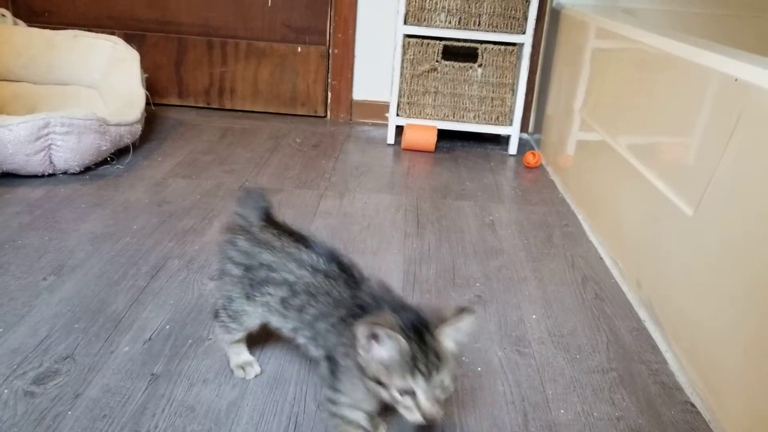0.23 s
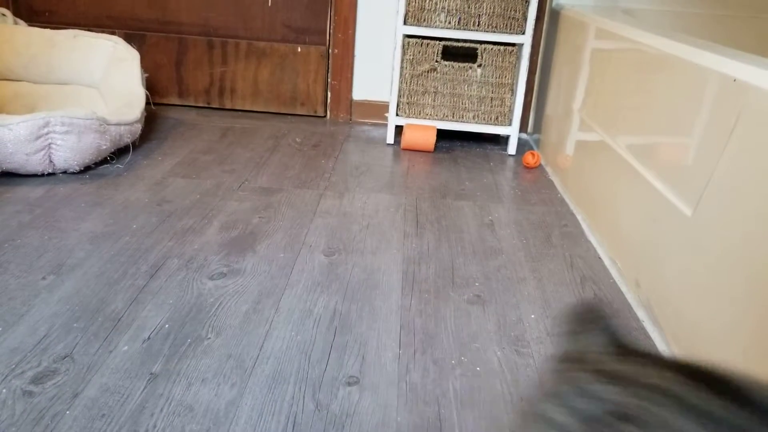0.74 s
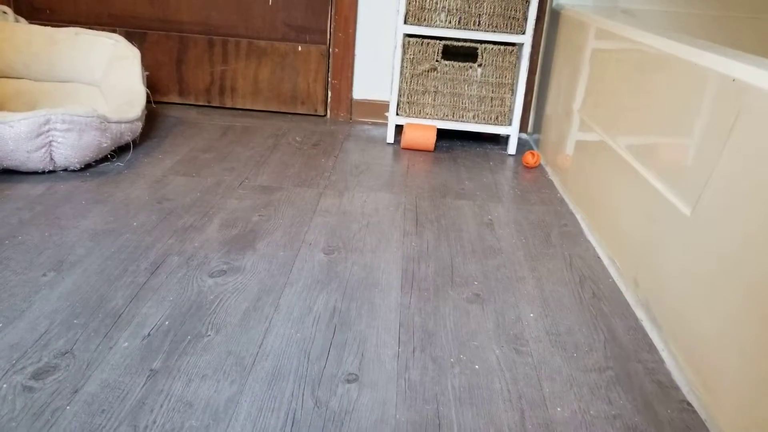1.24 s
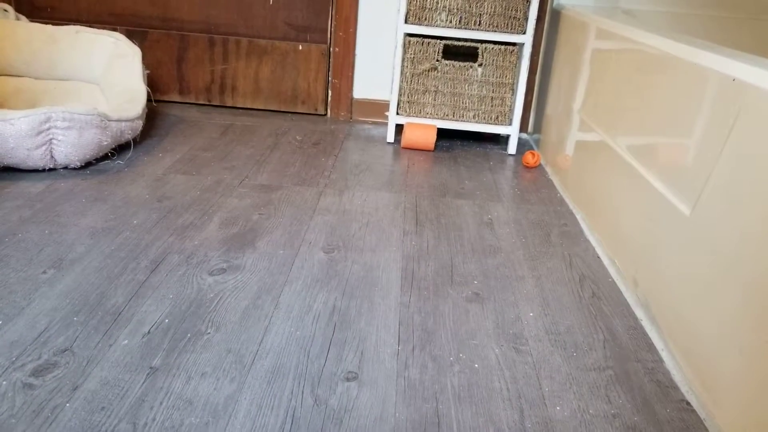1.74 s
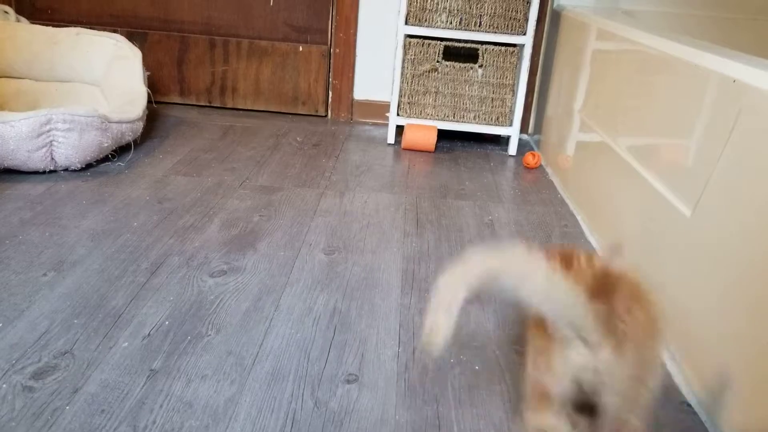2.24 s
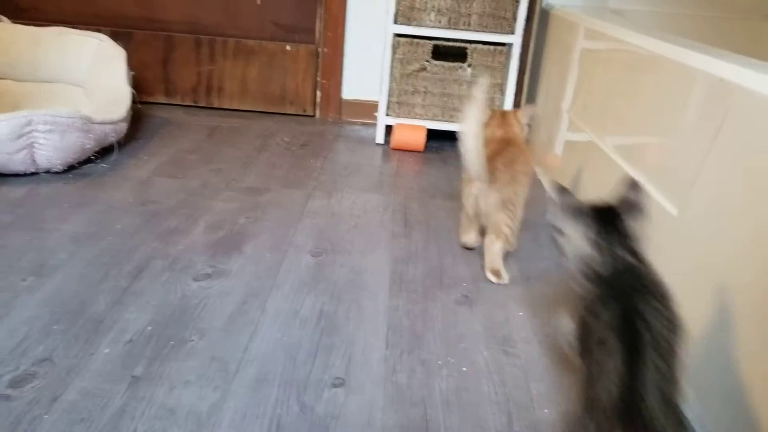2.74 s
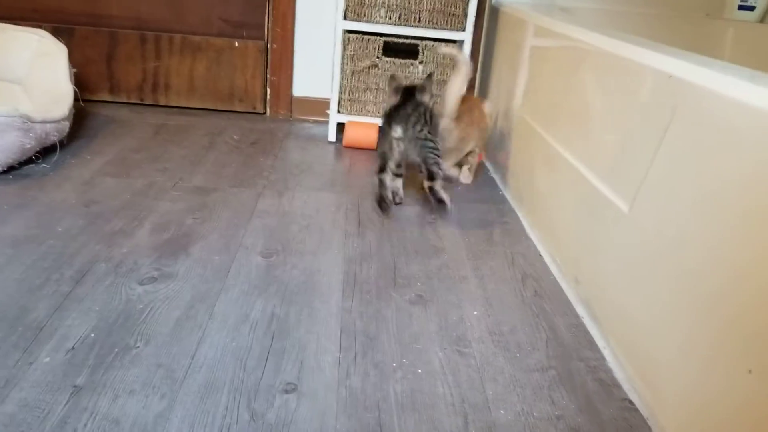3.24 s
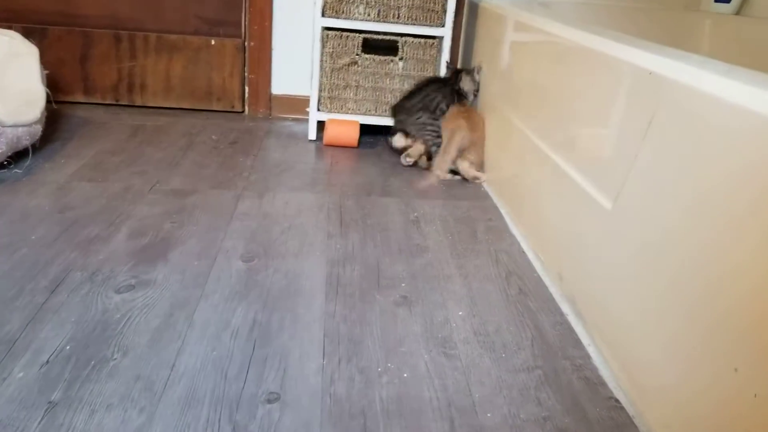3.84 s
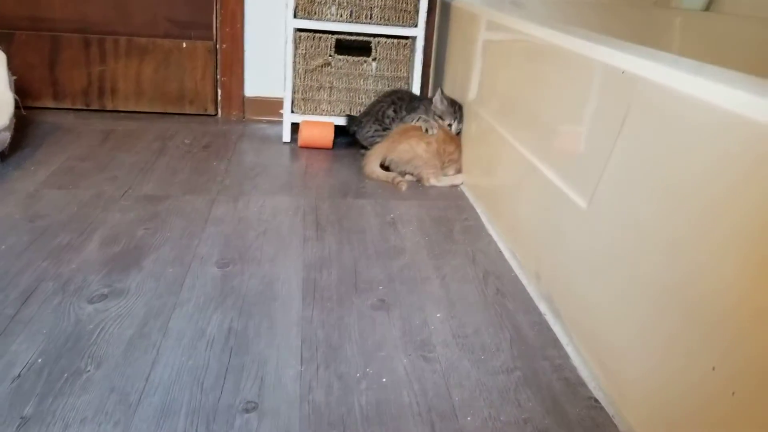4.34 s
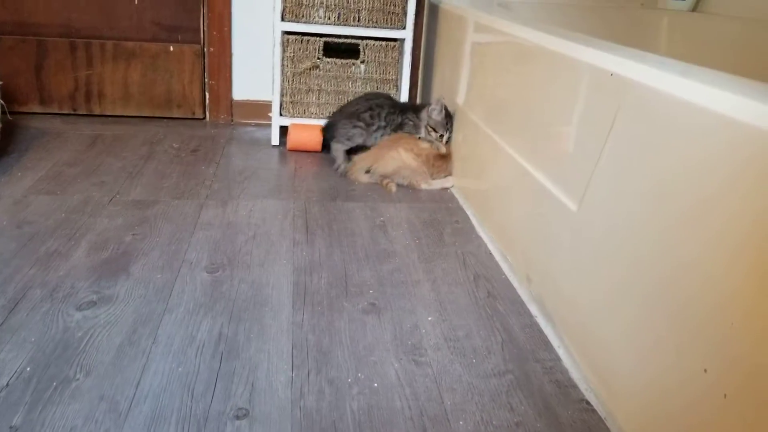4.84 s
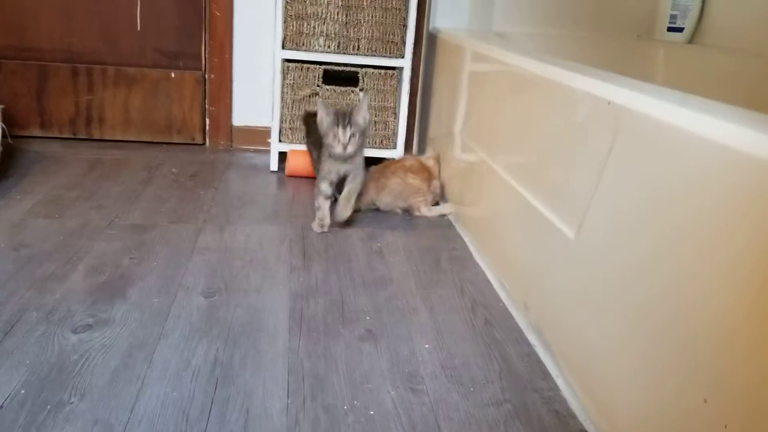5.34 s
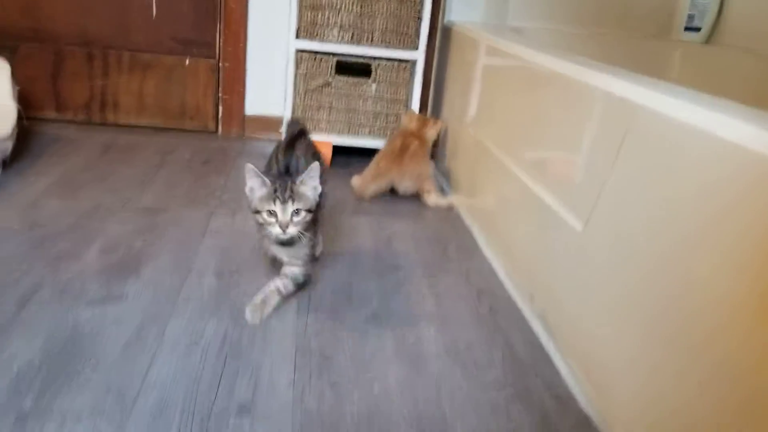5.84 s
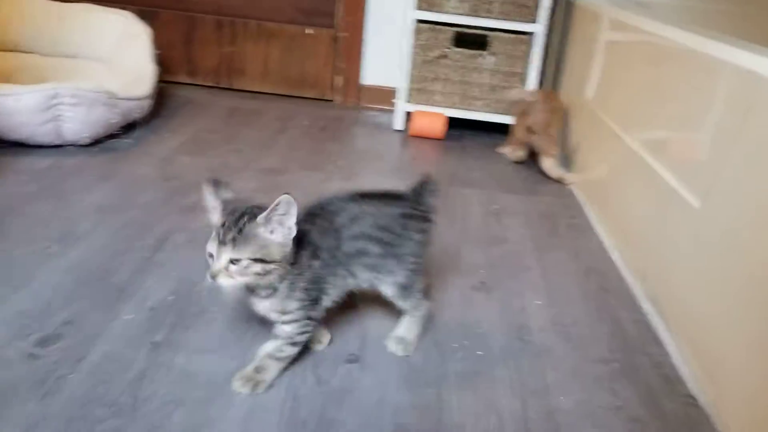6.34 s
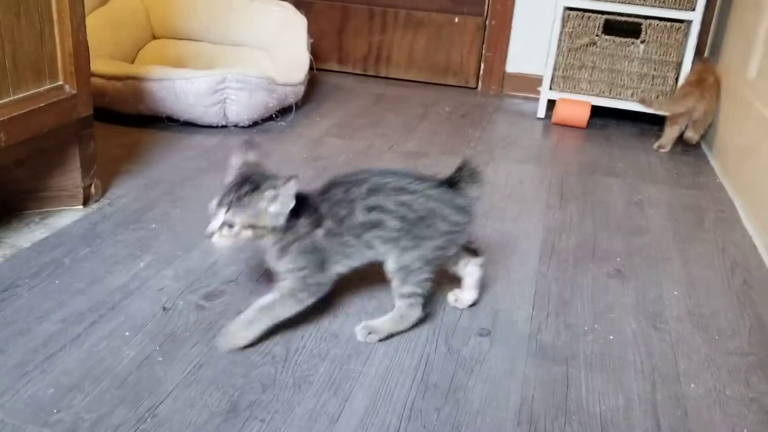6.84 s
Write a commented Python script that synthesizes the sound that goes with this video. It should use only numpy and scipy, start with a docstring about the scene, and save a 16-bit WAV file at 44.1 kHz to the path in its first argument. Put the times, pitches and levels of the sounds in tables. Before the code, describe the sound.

A quiet small room with low rumble and faint hiss. From about 0.8 to 1.5 s, soft paw thuds on laminate quicken, with two crisp claw scratches near 1 s and firmer steps at 1.35 and 1.5. After a pause, a thud and scratch come at 2.0, then light patter runs from 2.4 to 3.4, receding. Around 3.5 a longer claw scratch leads into overlapping low panel booms and a wooden knock at 3.6-3.75, as a toy ball jingles thinly. A paw thuds at 3.8; the loudest, sharp shelf knock hits at 4.05 with a hollow phone rub. It calms until a tiny pop and faint knock near 5.0. At 5.7 a bright quick scrape, light knock, jingle and hollow rub coincide. Soft steps, slides, claw ticks, small jingles and repeated handling rubs continue to 7 s, with another light knock at 6.9.

```python
"""Two kittens at play on a laminate floor

Paws thud as decaying board modes with a dull noise patter; claws tick, and claws, pads and fur scrape
as stick-slip grains. Bodies bump a wall panel (low modes) and a wooden shelf (noise plus modes).
A toy ball jingles with randomly struck bell modes; finger friction rings a hollow phone case and one
tiny pop sounds. A small room adds decaying noise tails, over a low rumble with faint hiss."""
import sys
import numpy as np
from scipy import signal
from scipy.fft import rfft, irfft, next_fast_len
from scipy.io import wavfile
from scipy.ndimage import uniform_filter1d

SR = 44100
rng = np.random.default_rng(int(sys.argv[2]) if len(sys.argv) > 2 else 0)


def unload_wav(signal):
    """Save mono or channel-first audio to the path in sys.argv[1] as 16-bit WAV at rate SR, clipped to [-1, 1]."""
    wavfile.write(
        sys.argv[1],
        SR,
        np.round(np.clip(np.atleast_2d(signal).T, -1, 1) * 32767).astype(np.int16),
    )


N = 312479
AGE = np.arange(SR // 2) / SR  # s since the start of one event
TIME = np.arange(N) / SR  # s since the start of the scene


def undb(db):
    """Level law: decibels to amplitude gain."""
    return 10 ** (np.asarray(db) / 20)


def fade(t60):
    """Exponential decay: 60 dB lost in t60 seconds."""
    return np.exp(-np.log(1000) * AGE / t60)


def noise_burst():
    """White noise as long as one event: equal power at all frequencies."""
    return rng.standard_normal(len(AGE))


def shape(x, gain):
    """Linear filtering: multiply the spectrum by a gain that is a function of frequency."""
    size = next_fast_len(x.shape[-1] + 4096)
    f = np.maximum(np.fft.rfftfreq(size, 1 / SR), 1)
    return irfft(rfft(x, size) * gain(f), size)[..., :x.shape[-1]]


def colour(x, points):
    """Spectral envelope: filter by (f/Hz, level/dB) points joined on a logarithmic frequency axis."""
    hz, db = np.transpose(points)
    return shape(x, lambda f: undb(np.interp(np.log(f), np.log(hz), db)))


def band(x, lo, hi, order=3):
    """Causal band-pass: the output never precedes the excitation."""
    sos = signal.butter(order, [lo, min(hi, SR / 2 - 100)], "band", fs=SR, output="sos")
    return signal.sosfilt(sos, x)


def loudest(x, db, size=441):
    """Short-time level: scale so that the loudest hundredth of a second has this RMS level."""
    return x * undb(db) / np.sqrt(uniform_filter1d(x * x, size).max())


def add(track, s, x):
    """Superposition: mix a sound in at time s."""
    i = max(int(s * SR), 0)
    track[i:i + len(x)] += x[:N - i]


def ring(modes, scatter_db, tune=1):
    """Modal vibration: each contact weights and detunes the decaying modes a little differently."""
    chance = rng.standard_normal((len(modes), 2))
    out = 0
    for (hz, db, t60), (a, b) in zip(modes, chance):
        mode_hz = hz * tune * (1 + 0.019 * b)
        out = out + undb(db + scatter_db * a) * fade(t60) * np.sin(2 * np.pi * mode_hz * AGE)
    return out


def touch(x, edges, levels):
    """Contact hardness: it sets how strongly each register sounds."""
    return sum(loudest(band(x, lo, hi), db) for lo, hi, db in zip(edges, edges[1:], levels))


def friction(rise, fall, grain_db, slip_rate=3500):
    """Stick-slip friction: random grains swell and die away; returns them and the time of their height."""
    lead = 2 * rise
    growth = np.exp(-((AGE - lead) / rise) ** 2)
    release = np.exp(-np.abs(AGE - lead) / fall)
    swell = np.where(AGE < lead, growth, release)
    strength = undb(grain_db * np.minimum(rng.exponential(size=len(AGE)), 4))
    slipping = rng.random(len(AGE)) < slip_rate / SR
    return swell * noise_burst() * strength * slipping, lead


def scrape(grains, hz, octaves, skirt=1.62):
    """Broad resonance: friction grains fall to half amplitude this many octaves off its centre."""
    return shape(grains, lambda f: 1 / (1 + np.abs(np.log2(f / hz) / octaves) ** skirt))


def diffuse(count, spacing_hz=1150, likeness=0.94):
    """Diffuse field: noise alike at both microphones in the bass, mostly unrelated in the treble."""
    mid, side = rng.standard_normal((2, count))
    alike = lambda f: likeness * np.sinc(f / spacing_hz)
    mid = shape(mid, lambda f: np.sqrt(1 + alike(f)))
    side = shape(side, lambda f: np.sqrt(1 - alike(f)))
    return np.array([mid + side, mid - side]) / np.sqrt(2)


# paws landing: [t/s, level/dB, strongest board resonance f/Hz, hardness/dB: extra slap of the pad]
LANDINGS = [(0.774, -57.5, 318, 0), (0.81, -54, 242, -9), (0.887, -51.5, 150, 2.5), (0.944, -44, 230, 2.5),
            (1.282, -57.5, 177, -2), (1.349, -44.5, 240, 5.5), (1.477, -41.5, 190, 5.5),
            (1.975, -48, 250, -2), (2.409, -60, 290, -5), (2.519, -54.5, 256, 3.5), (2.551, -54.5, 262, -1),
            (2.638, -53.5, 264, -5), (2.696, -47.5, 284, -4.5), (2.836, -46.5, 460, -8),
            (2.872, -54, 182, -0.5), (3.013, -51.5, 216, 0), (3.051, -43.5, 259, -12),
            (3.119, -49.5, 295, 0.5), (3.193, -55, 246, 2), (3.341, -43.5, 410, 11.5),
            (3.365, -47.5, 170, 10), (3.799, -40.5, 237, 0), (5.913, -55.5, 170, 0), (6.05, -48, 229, -11),
            (6.29, -57, 250, 0), (6.506, -51.5, 410, 0), (6.551, -44.5, 420, 6), (6.643, -48.5, 250, -2),
            (6.741, -47.5, 404, 8), (6.864, -53.5, 284, 7)]
# floorboard modes: [f/Hz, relative level/dB, t60/s]
BOARD_MODES = [(95.75, -8.5, 0.41), (138.7, 1.5, 0.2), (167.4, -11.5, 0.27), (247.8, -3, 0.25),
               (280.3, 5, 0.082), (373, 3, 0.068), (454, -9, 0.29), (533, -9, 0.16), (664, 8, 0.033),
               (824, -12, 0.22), (1290, -39, 0.048)]
# a landing's thud and slap against its pad sound; spots ringing above SPOT_HZ are stiffer and thud less
THUD_DB, SLAP_DB, SPOT_HZ, THUD_DB_PER_OCTAVE = -1.5, -14, 250, -6.5


def paws(patter_db=-5, patter_t60=0.15, press_s=0.003036, spot_db=5, spot_octaves=0.28):
    """Impact on a modal plate: soft pads ring the boards, each spot favouring a note; toes patter dully."""
    out = np.zeros(N)
    edges = (50, 180, 600, 1800)  # Hz: thud, pad, slap
    patter_colour = [(60, 1), (250, -4), (600, -10), (1000, -18), (2000, -20.0)]  # f/Hz, level/dB
    for s, db, hz, hardness in LANDINGS:
        boards = loudest(ring(BOARD_MODES, scatter_db=0.5), 0)
        toes = colour(noise_burst(), patter_colour) * fade(patter_t60)
        step = (boards + loudest(toes, patter_db)) * (1 - np.exp(-AGE / press_s))
        step = shape(step, lambda f: undb(spot_db * np.exp(-(np.log2(f / hz) / spot_octaves) ** 2)))
        thud_db = THUD_DB + THUD_DB_PER_OCTAVE * np.log2(hz / SPOT_HZ)
        parts = np.array([thud_db, 0, SLAP_DB + hardness])
        add(out, s - press_s, touch(step, edges, db + parts))
    return out


# claws clicking on the floor: [t/s, level/dB before gain_db, brightness/dB: high register against low]
CLAW_CLICKS = [(0.825, -71, 7.5), (1.075, -73, -2), (1.3431, -54.5, -6.5), (2.36, -69, 1),
               (2.4022, -72, 8.5), (2.5481, -66.5, 5.5), (2.6339, -68, 1.5), (2.8317, -75, 8.5),
               (2.985, -54.5, 0), (3.1113, -58.5, -3), (3.3046, -56.5, 6.5), (3.4927, -41.5, -5.5),
               (3.6384, -57, 4), (4.0098, -58, 8.5), (4.0425, -40, -16), (5.0656, -56, -5),
               (5.6204, -64, -1), (5.68, -55, -0.5), (6.2881, -57.5, 1), (6.5008, -57.5, -1),
               (6.597, -57.5, 8.5), (6.9094, -41, -10)]
# colour of the noise in a claw click: [f/Hz, relative level/dB]
CLICK_COLOUR = [(900, 1), (1600, 1), (3000, 4.5), (5200, 0), (7000, -16), (9500, -12), (13000, -13.5),
                (16000, -17)]


def claws(gain_db=-2, tick_t60=0.028, skid_db=-8, skid_t60=0.29):
    """Hard impact with sliding: a sharp tick of noise with a weaker, longer skid behind it."""
    out = np.zeros(N)
    edges = (1500, 6500, 16000)  # Hz
    for s, db, brightness in CLAW_CLICKS:
        envelope = fade(tick_t60) + undb(skid_db) * fade(skid_t60)
        tick = colour(noise_burst(), CLICK_COLOUR) * envelope
        add(out, s, touch(tick, edges, db + gain_db + np.array([0, brightness])))
    return out


# claws catching as a kitten pushes off: [t/s, level/dB before gain_db, decay time constant/s, centre f/Hz]
CLAW_SCRATCHES = [(0.989, -44.5, 0.0066, 1610), (1.018, -43.5, 0.0063, 1960), (1.991, -46.5, 0.011, 1880),
                  (3.496, -43.5, 0.055, 1303)]
# further colour of a scratch: [f/Hz, gain/dB]
SCRATCH_COLOUR = [(3500, 0), (5300, -11), (7000, -16), (10000, -18)]


def scratches(gain_db=-1, catch_s=.001, width_octaves=0.74):
    """Stick-slip with abrupt onset: a claw catches and crackles over the grain of the floor."""
    out = np.zeros(N)
    for s, db, decay, hz in CLAW_SCRATCHES:
        grains, lead = friction(catch_s, decay, grain_db=0.5, slip_rate=1500)
        scratch = colour(scrape(grains, hz, width_octaves), SCRATCH_COLOUR)
        add(out, s - lead, loudest(scratch, db + gain_db))
    return out


# paws and fur sliding: [t of the height/s, level/dB before gain_db, swell/s, centre f/Hz, width/octaves]
PAW_SLIDES = [(0.939, -63, 0.06, 10600, 0.64), (0.959, -56, 0.02, 2600, 0.88),
              (1.32, -67, .035, 3600, 0.36), (1.41, -58, 0.029, 4060, 0.16), (1.46, -73, .09, 9900, .3),
              (2.05, -72.5, .07, 11100, 0.33), (3.2, -67.5, 0.022, 3560, 0.41),
              (3.32, -51.5, 0.051, 1110, 0.69), (4.0, -53, 0.068, 1700, 1.7),
              (4.73, -68.5, .018, 4100, 5.7), (5.67, -60, 0.03, 2400, 4.2), (5.722, -37, .011, 2750, 0.91),
              (5.859, -49, 0.016, 2160, 1.4), (6.04, -67, .035, 3020, .2), (6.122, -58.5, 0.02, 1885, 1.8),
              (6.26, -57.5, 0.028, 2130, 6.5), (6.526, -56.5, 0.03, 3650, .5),
              (6.63, -57.5, 0.099, 1000, 2), (6.934, -51, .03, 3700, 1.7), (7.04, -58.5, 0.054, 3120, 3.2)]
# further colour of a slide: [f/Hz, gain/dB]
SLIDE_COLOUR = [(5300, -0.5), (7000, -18.5), (10000, -9)]


def slides(gain_db=-2, release_per_swell=1.05):
    """Stick-slip with gradual onset: pads and fur slide, swelling and letting go."""
    out = np.zeros(N)
    for s, db, swell, hz, octaves in PAW_SLIDES:
        grains, lead = friction(swell, swell * release_per_swell, grain_db=4, slip_rate=2200)
        slide = colour(scrape(grains, hz, octaves), SLIDE_COLOUR)
        add(out, s - lead, loudest(slide, db + gain_db))
    return out


# bodies bumping the wall panel: [t/s, level/dB, pitch factor]
PANEL_BUMPS = [(3.588, -30.5, 1.02), (3.632, -28.5, 1.106), (3.658, -29.5, 0.913), (3.704, -37.5, 0.75)]
# wall panel modes: [f/Hz before the pitch factor, relative level/dB, t60/s]
PANEL_MODES = [(90, -11, 0.3), (114.2, -1, 0.12), (142, -11.5, 0.11), (279, -14, 0.12)]


def bumps(push_s=0.013):
    """Soft impact: a body leans gradually into the panel, whose low modes boom."""
    out = np.zeros(N)
    for s, db, tune in PANEL_BUMPS:
        boom = -ring(PANEL_MODES, scatter_db=-1, tune=tune) * (1 - np.exp(-AGE / push_s))
        add(out, s, loudest(boom, db))
    return out


# knocks on the shelf: [t/s, level/dB, hardness/dB: step in level from the body of the sound to its crack]
SHELF_KNOCKS = [(3.623, -36.5, -8), (3.733, -47, -9), (3.756, -41, -25), (3.772, -49.5, -15),
                (4.045, -28.5, -1.5), (5.068, -44, -4), (5.717, -44, -6.5), (6.908, -41.5, -7.5)]
# shelf modes: [f/Hz, relative level/dB, t60/s]
SHELF_MODES = [(370, -4.5, 0.092), (615, -2, 0.1), (746, -22, 0.18), (816, 8, 0.037), (940, 6, 0.053),
               (946, -24, 0.069), (1161.7, -6, 0.16)]
# dense ringing of wood and wicker: [f/Hz, relative level/dB]
WOOD_COLOUR = [(150, 3), (350, -12.5), (580, 1.5), (740, -6.5), (920, -8.5), (1250, -16), (1480, -22.5),
               (1900, -17), (2750, -17.5), (3500, -38), (5000, -24), (7000, -50)]


def knocks(modes_db=-8, clatter_t60=0.19, crack_db=5, crack_t60=0.023, first_db=-6, edge_db=-16):
    """Two-stage impact: the shelf touches lightly, seats with a crack a moment later and clatters."""
    out = np.zeros(N)
    edges = (250, 1200, 3500, 7000)  # Hz: body, crack, top
    seat_s = .004
    for s, db, hardness in SHELF_KNOCKS:
        envelope = fade(clatter_t60) + undb(crack_db) * fade(crack_t60)
        clatter = colour(noise_burst(), WOOD_COLOUR) * envelope
        modes = loudest(ring(SHELF_MODES, scatter_db=5.5), modes_db)
        blow = (loudest(clatter, 0) + modes) * np.where(AGE < seat_s, undb(first_db), 1)
        # wood takes edge_db more off the top of every knock
        parts = np.array([0, hardness, hardness + edge_db])
        add(out, s - .001, touch(blow, edges, db + parts))
    return out


# bell modes: [f/Hz, relative level/dB]
BELL_MODES = [(4247, -87.5), (4877, -78.5), (8489, -84), (9232, -80.5), (9399, -86.5), (10169, -76.5)]
# the toy ball is jostled: [t/s, strength/dB, time it keeps rolling/s, high modes against low ones/dB]
BALL_JOSTLES = [(3.26, -77.5, .03, 7.5), (3.315, -66.5, 0.086, -6), (3.41, -58.5, 0.026, -9),
                (3.55, -60, 0.038, 4), (3.65, -64.5, 0.12, 2.5), (3.93, -65, 0.065, 1),
                (4.0, -54, 0.057, -2), (4.15, -60, 0.11, -1), (4.52, -80.5, 0.022, 8),
                (4.96, -70.5, 0.053, -12), (5.72, -59.5, 0.18, -4), (5.865, -74.5, 0.018, 13),
                (5.96, -67.5, 0.085, 1), (6.29, -67, 0.038, 8), (6.53, -65, .06, 9.5),
                (6.6, -56, 0.021, -1), (6.69, -68, 0.13, -3), (6.91, -63, 0.13, 1)]


def bell(low_db=-4, high_db=-2, strike_rate=70, ring_t60=0.15, scatter_db=3.5,
         rattle_db=-6, rattle_t60=0.057, roll_db=-11):
    """Random modal excitation: a pellet tumbles in a slit shell and the modes' shares vary as it turns."""
    turn_rate, turn_db = 16, 2.5  # levels per second, scale of their spread
    struck = rng.random(N) < strike_rate / SR
    blows = lambda: struck * undb(scatter_db * rng.standard_normal(N))

    def even(x):
        """Level normalisation: divide by the running RMS, with a floor for the quiet parts."""
        return x / np.sqrt(uniform_filter1d(x * x, int(.07 * SR)) + 0.0085 * x.var())

    deep, shrill = np.zeros(N), np.zeros(N)
    for hz, db in BELL_MODES:
        share = undb(db + turn_db * turning(turn_rate))
        response = fade(ring_t60) * np.sin(2 * np.pi * hz * AGE)
        register = deep if hz < 7000 else shrill
        register += share * signal.oaconvolve(blows(), response)[:N]
    deep, shrill = even(deep), even(shrill)
    # beneath the ringing the pellet rattles and rolls, tonelessly
    grit = rng.standard_normal(N) * signal.oaconvolve(blows(), fade(rattle_t60))[:N]
    rattle = even(band(grit, 9900, 14100, order=2))
    roll = even(band(grit, 3670, 5270, order=2))
    low = undb(low_db) * (deep + undb(roll_db) * roll)
    high = undb(high_db) * (shrill + undb(rattle_db) * rattle)
    return sum(undb(db) * rolling(s, hold) * (low + undb(tilt) * high) for s, db, hold, tilt in BALL_JOSTLES)


def turning(rate):
    """Slow random modulation: chance levels held 1 / rate s and slewed, with a spread near 1."""
    k = int(SR / rate)
    held = np.repeat(rng.standard_normal(N // k + 1), k)
    return 1.2 * uniform_filter1d(held, k)[:N]


def rolling(s, hold, spin_up_s=.02, settle_s=0.064):
    """Inertia and damping: the ball spins up until time s, rolls on for hold and settles exponentially."""
    spin_up = np.clip((TIME - s) / spin_up_s + 1, 0, 1)
    return spin_up * np.exp(-np.maximum(TIME - s - hold, 0) / settle_s)


# fingers rubbing the phone case: [nominal t of the height/s, level/dB, release time constant/s]
FINGER_RUBS = [(4.009, -43, 0.075), (4.42, -61, 0.36), (5.723, -39.5, 0.046), (5.809, -51, 0.033),
               (5.869, -49.5, 0.026), (6.125, -50, 0.022), (6.245, -53.5, .075), (6.515, -48.5, 0.035),
               (6.566, -46.5, 0.047), (6.65, -49, 0.037), (6.77, -48.5, 0.076), (6.926, -45.5, 0.03)]
# resonances of the phone case: [f/Hz, width/Hz, relative level/dB]
CASE_MODES = [(278, 18, -4.5), (403, 33, 4.5), (560, 70, -23), (882, 10.4, -13.5)]


def handling(attack_share=.42, attack_max_s=.05):
    """Friction-driven resonance: finger grains, swelling for a share of their release, ring the case."""
    out = np.zeros(N)
    for s, db, fall in FINGER_RUBS:
        grains, lead = friction(min(attack_share * fall, attack_max_s), fall, grain_db=3)
        hollow = 0
        for hz, width, mode_db in CASE_MODES:
            hollow = hollow + undb(mode_db) * band(grains, hz - width / 2, hz + width / 2, order=1)
        add(out, s - lead - .005, loudest(band(hollow, 164, 1450, order=2), db))
    return out


# one tiny pop close to the phone: (t of its centre/s, peak level/dB, f/Hz, half length/s)
TINY_POP = (5.0062, -41, 1150, .0016)


def pop():
    """Gaussian tone burst: a dry pop of a few cycles."""
    s, db, hz, half = TINY_POP
    return undb(db) * np.exp(-((TIME - s) / half) ** 2) * np.sin(2 * np.pi * hz * (TIME - s))


# room rumble and hiss: [f/Hz, relative spectral level/dB]
AIR_COLOUR = [(20, -26), (38, -8), (60, 2), (115, 1.5), (185, -14.5), (245, -10.5), (320, -21), (430, -10),
              (600, -18.5), (900, -27.5), (1800, -30), (5000, -37), (12000, -39), (16000, -33.5)]


def air(level_db=-60):
    """Stationary diffuse noise: steady low rumble of the house with faint hiss."""
    x = colour(diffuse(N), AIR_COLOUR)
    return x * undb(level_db) / x.std()


# room decay: [f/Hz, t60/s]
ROOM_DECAY = [(100, 0.68), (400, 0.43), (900, 0.27), (3000, 0.2), (8000, 0.33), (15000, 0.49)]
# where the kittens are: [t/s, delay of the left microphone/s]
KITTEN_BEARING = [(0, 0.0007), (2.1, 0), (3, 0.00052), (4.5, 0), (5, 0.00004), (7.09, 0.0002)]
# how far the kittens are from the phone: [t/s, distance/m]
KITTEN_DISTANCE = [(0, 1.1), (1, 0.48), (2.1, 0.43), (3.3, 1.52), (5.3, 0.95), (7.09, 1)]


def room(x, wet_db, bass_db=-6, build_s=0.0017, echo_db_per_doubling=2):
    """Direct and reverberant field: the left lags by the bearing; bare walls add a tail, more from afar."""
    edges = np.geomspace(60, 19000, 9)  # Hz
    hz, t60 = np.transpose(ROOM_DECAY)
    noise = diffuse(len(AGE))
    tail = 0
    for lo, hi in zip(edges, edges[1:]):
        part = shape(noise, lambda f: (f >= lo) & (f < hi))
        tail = tail + part * fade(np.interp(np.sqrt(lo * hi), hz, t60))
    tail = tail * (1 - np.exp(-AGE / build_s))
    # unit energy per microphone, on average, before the bass cut
    tail = colour(tail / np.sqrt(np.sum(tail ** 2) / 2), [(150, bass_db), (500, 0)])
    delay = np.interp(TIME, *np.transpose(KITTEN_BEARING))
    direct = np.array([np.interp(TIME - delay, TIME, x), x])
    distance = np.interp(TIME, *np.transpose(KITTEN_DISTANCE))
    send = x * undb(wet_db + echo_db_per_doubling * np.log2(distance))
    return direct + signal.fftconvolve(send[None], tail, axes=1)[:, :N]


PAN_DB = -2.6  # left level minus right level of the brighter sounds


def scene():
    """Superposition of sources: thuds spread through the floor; brighter sounds lie a little to the right."""
    thuds = room(paws() + bumps(), wet_db=-3)
    floor_friction = room(claws() + scratches() + slides(), wet_db=2.5)
    bright = room(knocks(), wet_db=-1) + room(bell(), wet_db=-3.5) + floor_friction
    pan = undb(np.array([[PAN_DB], [-PAN_DB]]) / 2)
    return thuds + bright * pan + room(handling(), wet_db=-6) + pop() + air()


TOP_HZ = 15900


def record(dry):
    """Band limitation: the phone cuts the top with a steep elliptic low-pass."""
    return signal.sosfilt(signal.ellip(10, .2, 70, TOP_HZ, fs=SR, output="sos"), dry)


dry = scene()
out = record(dry)
unload_wav(out)
```